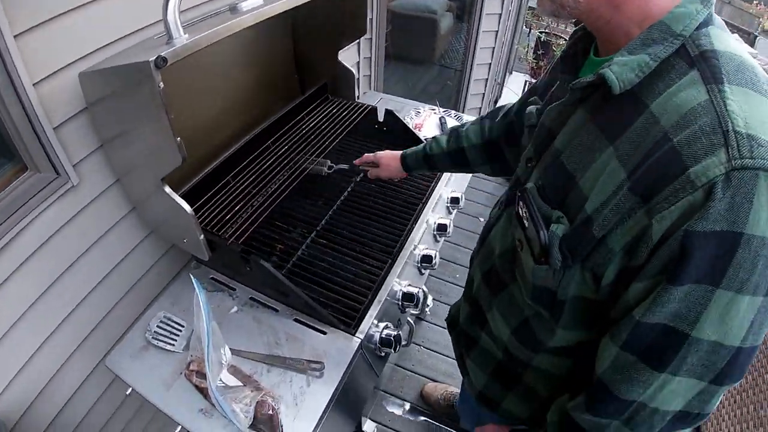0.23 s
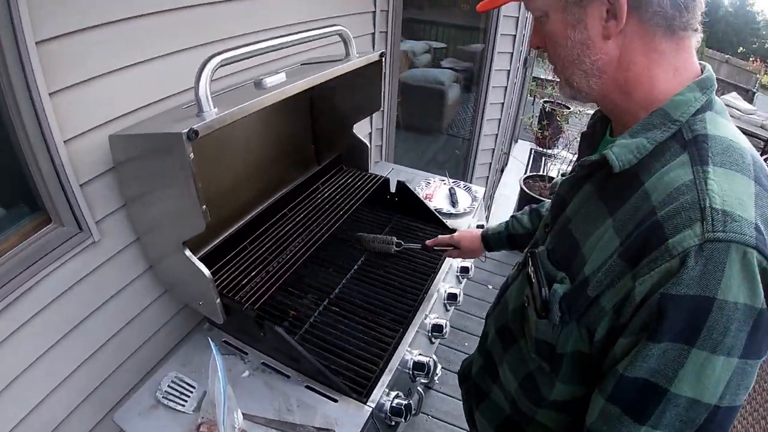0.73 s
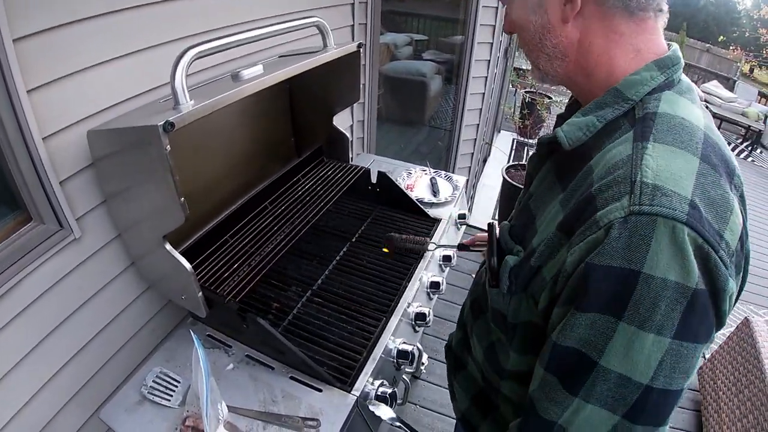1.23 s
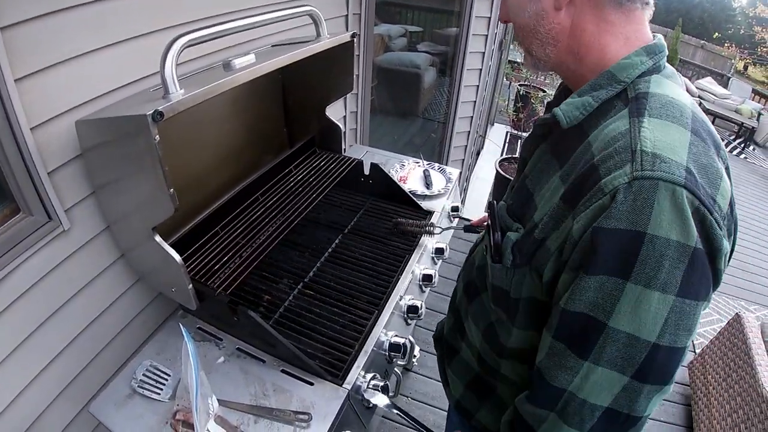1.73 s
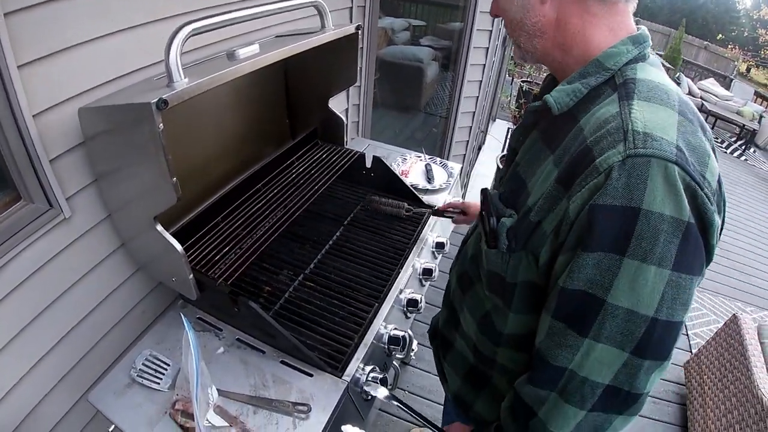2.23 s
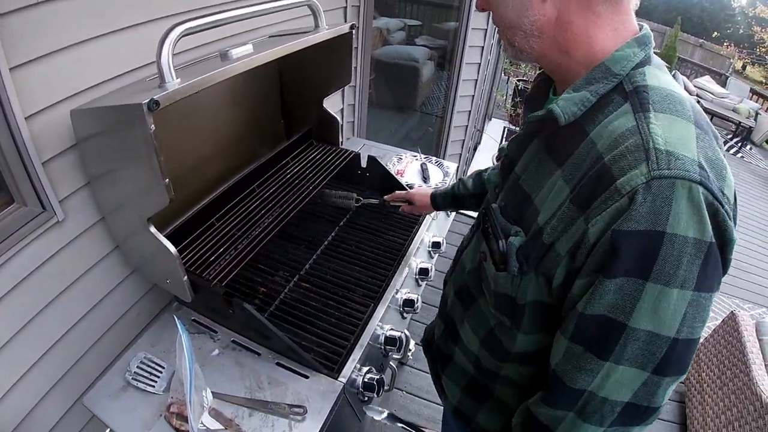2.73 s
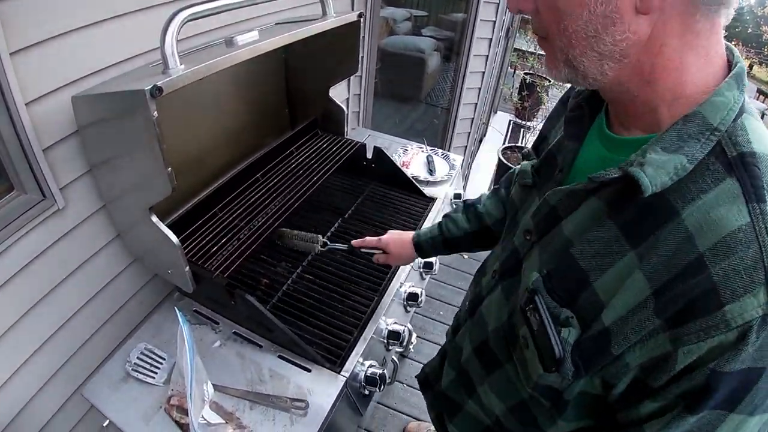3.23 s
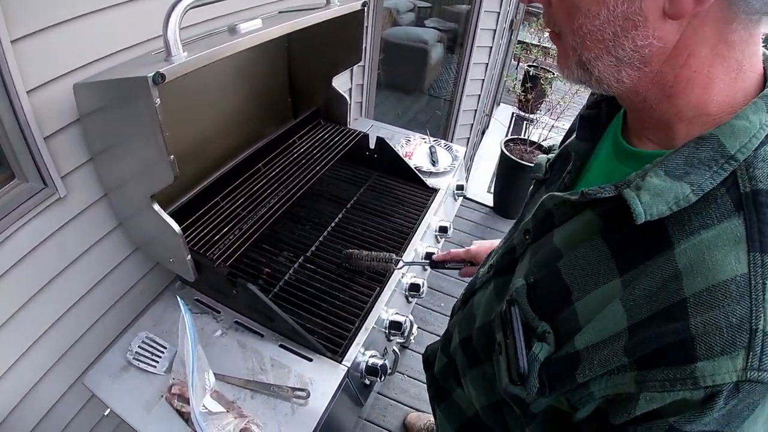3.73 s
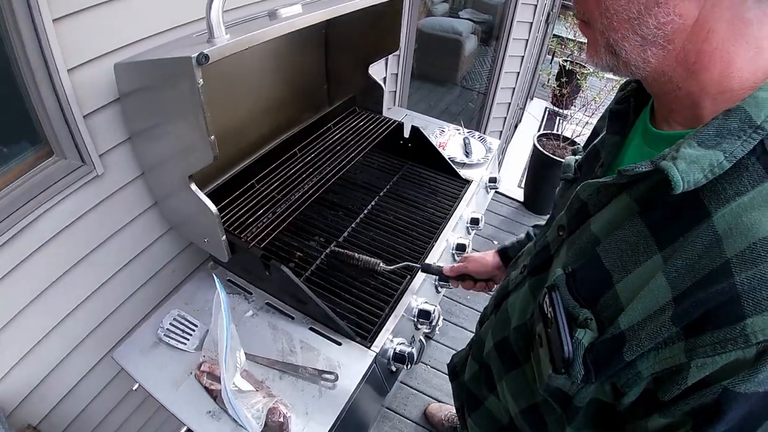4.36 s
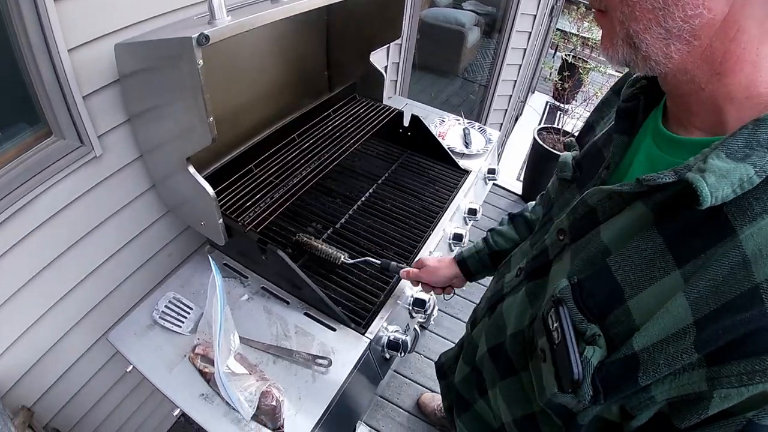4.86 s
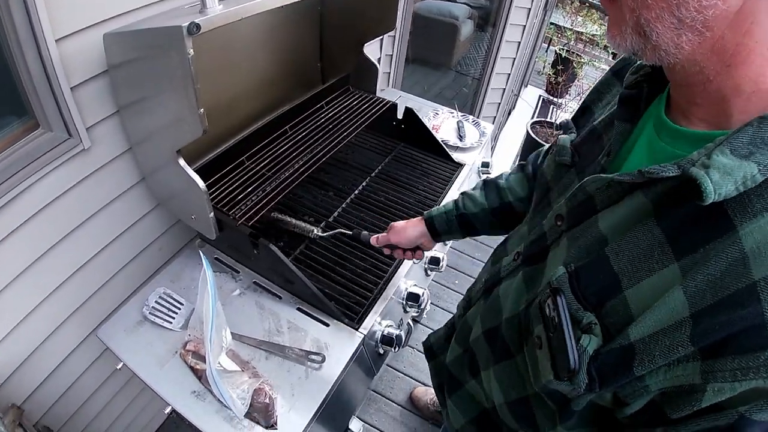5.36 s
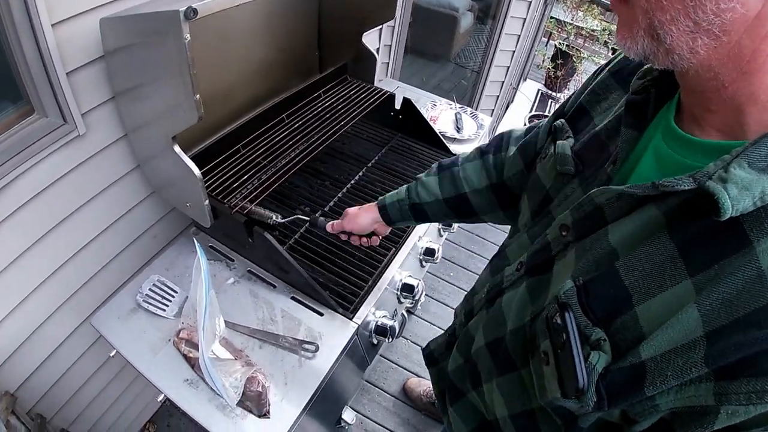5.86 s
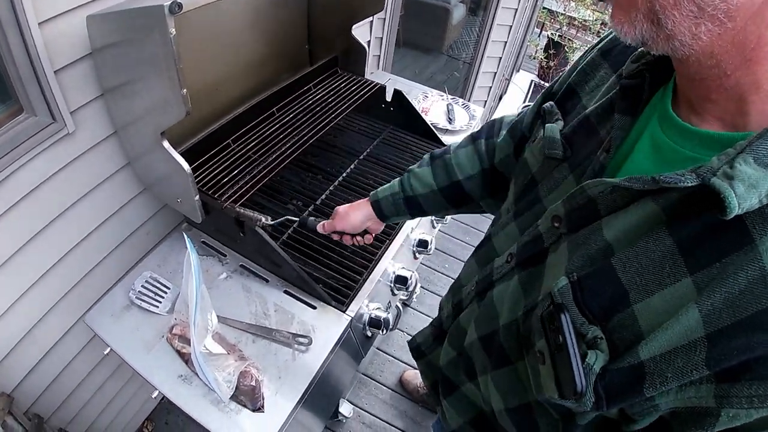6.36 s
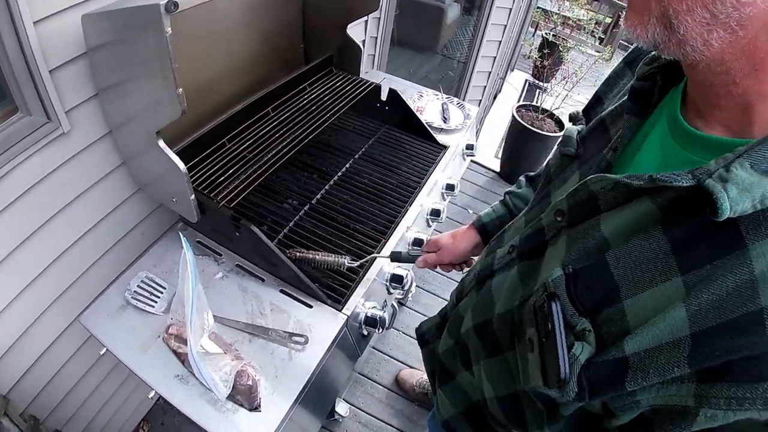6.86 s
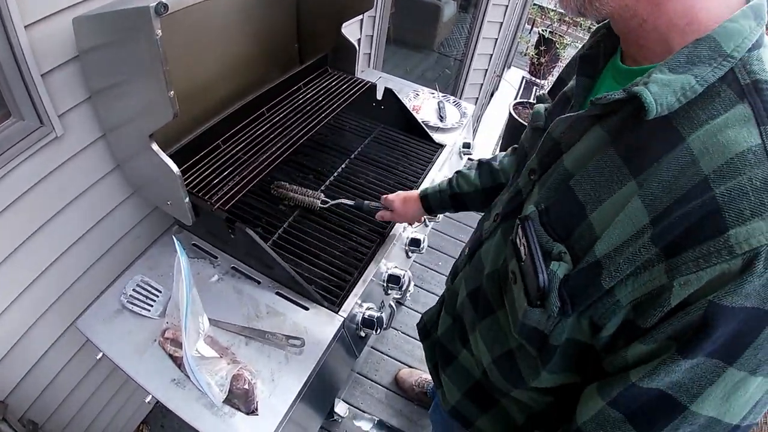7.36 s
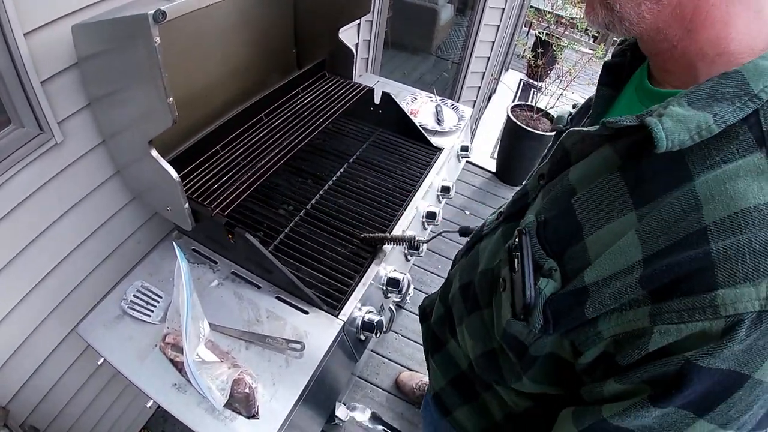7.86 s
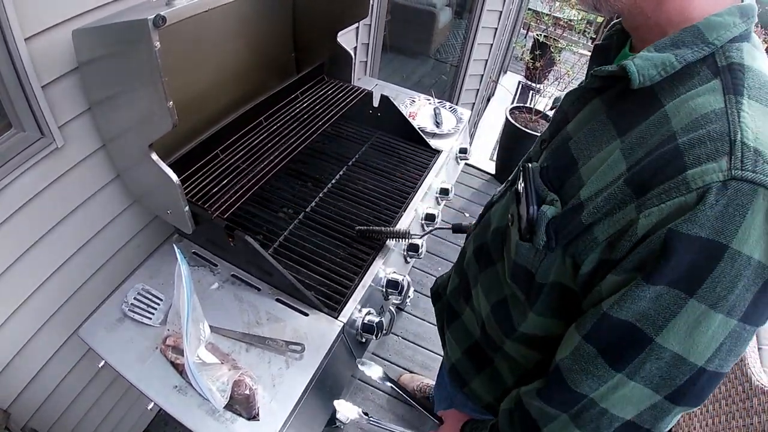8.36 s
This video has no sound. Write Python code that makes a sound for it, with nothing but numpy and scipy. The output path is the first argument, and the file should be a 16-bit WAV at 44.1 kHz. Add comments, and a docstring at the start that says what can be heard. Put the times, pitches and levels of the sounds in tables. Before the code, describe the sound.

Close outdoors on a deck, a stiff wire brush scrubs metal grill grates at four or five strokes a second. Each stroke bites with a gritty rasp and bright bristle hiss, then lets go. The brush head knocks the bars irregularly, making dull clanks while the hollow firebox and hood boom briefly. Near the end one long, even drag sings along the bars and fades. Quiet air lies beneath.

```python
"""Bristles hiss and rasp over the grates of a gas grill, four or five strokes a second, then one long drag.
Wire tips flick over the bars and ring them; each stroke bites, swells, sags and lets go.
The brush head knocks the grate, and firebox, hood and cart boom along, over quiet air and a faint whine.
Flicks are random impulses, coloured by spectra and resonances; knocks add decaying modes.
The two channels are equally loud and differ in phase until the drag, which is centred."""
import sys
import numpy as np
from scipy import signal
from scipy.fft import rfft, irfft, next_fast_len
from scipy.io import wavfile
from scipy.ndimage import uniform_filter1d, map_coordinates

SR = 44100
rng = np.random.default_rng(int(sys.argv[2]) if len(sys.argv) > 2 else 0)


def master_out(mix):
    """Clip the mix to full scale and print it as 16-bit PCM to the path in sys.argv[1]."""
    frames = np.transpose(np.atleast_2d(mix))
    ceiling = np.clip(frames, -1, 1)
    pcm = np.round(ceiling * 32767).astype(np.int16)
    wavfile.write(sys.argv[1], SR, pcm)


N = 379260

# Levels in all tables are relative: the sources trim them.
# strokes to and fro; fastest_at and heaviest_at are shares of the length:
# start_s, length_s, bite_s, fastest_at, heaviest_at, hiss_db, rasp_db, hood_db, cart_db
STROKES = [(-0.068, 0.2, 0.063, 0.47, 0.4, -46.5, -36, -35.5, -35),
           (0.131, 0.22, 0.014, 0.43, 0.41, -48, -38.5, -38, -39),
           (0.32, 0.19, 0.021, 0.44, 0.57, -46, -38, -38.5, -40.5),
           (0.521, 0.22, 0.009, 0.49, 0.41, -46, -37.5, -36.5, -45),
           (0.72, 0.2, 0.054, 0.13, 0.46, -43, -34, -34, -37),
           (0.939, 0.23, 0.013, 0.47, 0.35, -50.5, -36, -35, -39),
           (1.126, 0.24, 0.035, 0.62, 0.63, -46, -37, -36.5, -42),
           (1.363, 0.22, 0.055, 0.3, 0.29, -45, -32.5, -32.0, -38.5),
           (1.564, 0.22, 0.029, 0.56, 0.57, -43, -37.5, -35.5, -41.5),
           (1.788, 0.25, 0.055, 0.68, 0.08, -47.5, -37.5, -31, -34.5),
           (1.983, 0.27, 0.063, 0.44, 0.46, -46, -40, -41, -40.5),
           (2.241, 0.25, 0.011, 0.4, 0.23, -49, -39, -35, -37),
           (2.468, 0.24, 0.04, 0.4, 0.25, -46.5, -38.5, -35, -40),
           (2.704, 0.17, 0.072, 0.53, 0.21, -45, -36.5, -32.5, -41),
           (2.857, 0.19, 0.029, 0.5, 0.62, -44.5, -37, -35.5, -40),
           (3.083, 0.18, 0.021, 0.4, 0.3, -46.5, -34.5, -31.5, -37),
           (3.239, 0.2, 0.034, 0.55, 0.62, -44.5, -36, -37, -42),
           (3.454, 0.22, 0.013, 0.34, 0.41, -46, -37.5, -36, -38.5),
           (3.646, 0.21, 0.059, 0.52, 0.57, -44.5, -36, -36, -38),
           (3.862, 0.26, 0.034, 0.45, 0.48, -49.5, -41, -41.5, -43),
           (4.083, 0.22, 0.084, 0.2, 0.49, -44.5, -37.5, -37.5, -46.5),
           (4.339, 0.26, 0.044, 0.13, 0.39, -43, -38.5, -41, -43.5),
           (4.573, 0.2, 0.03, 0.32, 0.53, -44.5, -38, -34.5, -40),
           (4.798, 0.15, 0.011, 0.55, 0.3, -55, -49, -42, -43),
           (4.892, 0.19, 0.015, 0.56, 0.08, -47, -40, -32, -38),
           (5.049, 0.24, 0.058, 0.13, 0.47, -44.5, -41.5, -36, -44),
           (5.28, 0.24, 0.054, 0.7, 0.69, -48.5, -41, -37.5, -38.5),
           (5.493, 0.222, 0.052, 0.37, 0.39, -44.5, -39.0, -36, -43),
           (5.737, 0.28, 0.037, 0.24, 0.58, -47.5, -41, -41.5, -51),
           (5.971, 0.19, 0.04, 0.15, 0.49, -45.5, -38.5, -37.5, -44.0),
           (6.159, 0.26, 0.075, 0.18, 0.54, -47.5, -42.0, -41, -41.5),
           (6.375, 0.21, 0.052, 0.47, 0.44, -46, -39, -36.5, -42),
           (6.575, 0.27, 0.072, 0.23, 0.65, -47.5, -40.5, -42, -51),
           (6.802, 0.21, 0.036, 0.48, 0.55, -45.5, -39, -36.5, -47),
           (7.085, 0.11, 0.023, 0.17, 0.46, -56.5, -50.5, -48, -57),
           (7.258, 0.22, 0.026, 0.65, 0.6, -44.5, -38, -38, -42),
           (7.453, 0.19, 0.023, 0.37, 0.43, -42, -37, -35, -38),
           (7.669, 0.19, 0.063, 0.26, 0.77, -46.5, -40, -35, -46),
           (7.823, 0.13, 0.026, 0, 0.37, -41.5, -38, -30.5, -30)]
# how a part follows a stroke: attack_share (of bite), release_s,
# sag_db (per stroke length away from the peak), rest_db (between strokes)
HISS_LAW = (1.0, 0.0373, 11, -66)
# same columns
RASP_LAW = (0.5, 0.0939, 14.5, -63.5)
# same columns
HOOD_LAW = (0.76, 0.0148, 19.5, -49)
# same columns
CART_LAW = (0.6, 0.11, 22, -53)
# push of the arm in the last drag: time_s, push_db
DRAG_PUSH = [(7.98, -.5), (8.05, -0.5), (8.106, 1.2), (8.16, -.5), (8.235, .7), (8.35, -4.5), (8.52, -10),
             (8.6, -22)]
# head knocks on the grate; spot_hz is the pitch that the struck spot favours:
# time_s, thud_db, boom_db, clank_db, crunch_db, ping_db, spot_hz
KNOCKS = [(0.178, -24.5, -18.5, -34, -52, -44.5, 257), (0.2, -21.5, -21, -35.5, -50, -49, 261),
          (0.597, -39, -31, -39, -52, -45, 265), (0.786, -37.5, -34, -35, -38, -54, 500),
          (0.993, -29.5, -22, -30.5, -45, -57, 275), (1.195, -33, -31.5, -30, -36, -47, 300),
          (1.386, -36, -38, -31, -32.5, -46, 420), (1.4, -28, -28, -26, -36, -51, 400),
          (1.411, -28, -31, -27, -31, -52, 380), (1.448, -27.5, -18.5, -22.5, -27, -46, 285),
          (1.63, -35.5, -30, -31.5, -34.5, -52, 342), (1.649, -33, -27, -27, -37, -53, 490),
          (1.669, -40, -31, -25.5, -40, -55, 500), (1.809, -42, -32, -32, -37, -55, 290),
          (1.823, -29, -19.5, -22.5, -32, -48, 300), (1.998, -29.5, -33.5, -41, -46, -58, 290),
          (2.058, -36, -30, -30, -40, -55, 298), (2.124, -50, -31, -35, -43, -56, 282),
          (2.252, -45, -30.5, -31, -31.5, -44, 280), (2.281, -28, -22, -25.5, -33, -46, 340),
          (2.487, -46, -41, -54, -44, -51, 280), (2.53, -26.5, -30, -30.5, -39, -52.5, 400),
          (2.722, -42, -33.5, -35, -57.5, -54, 490), (2.844, -35.5, -36, -41.5, -50, -47.5, 280),
          (2.923, -34, -36, -34.5, -58, -48.5, 400), (3.134, -17, -20, -21.5, -41, -37.5, 274),
          (3.148, -19.5, -22.5, -30.5, -53, -49.5, 280), (3.352, -39, -36, -24.5, -38, -54.5, 510),
          (3.521, -22, -17, -22, -36, -38, 267), (3.541, -24, -39, -30, -41, -36, 390),
          (3.947, -41, -34.5, -37, -57, -56.5, 357), (4.369, -37, -36, -31.5, -41, -54, 500),
          (4.669, -30, -26, -26, -34, -56, 488), (4.817, -29.5, -37, -41, -61, -55, 240),
          (4.91, -20.5, -18.5, -25.5, -41, -36, 550), (5.117, -28, -23.5, -24, -39, -49, 205),
          (5.374, -33, -26, -29, -56, -63, 490), (5.555, -45.5, -37, -30.5, -32.5, -57, 660),
          (5.802, -34.5, -30, -34, -58, -49, 510), (6.022, -38, -25, -27.5, -48, -40, 402),
          (6.244, -38, -32.5, -38, -47, -48, 315), (6.421, -33, -36, -43, -57.5, -60, 340),
          (6.66, -31.5, -35, -40, -46, -58, 290), (6.899, -28.5, -29, -30, -49.5, -52, 470),
          (7.174, -39, -28, -31.5, -36, -44.5, 270), (7.506, -26.5, -24, -26, -31.5, -44, 487),
          (7.556, -37, -40, -31, -48, -34.5, 482), (7.784, -25.5, -23, -30.5, -35.5, -48, 275),
          (7.861, -33.5, -35, -25, -33, -63, 470), (7.98, -35, -41, -37, -44, -54.5, 300)]
# spectrum of the bristles: freq_hz, density_db (per Hz)
BRISTLE_SPECTRUM = [(1200, -23.5), (2400, -3.5), (4200, 0), (5500, -2.5), (6750, 1.5), (7600, -13),
                    (9000, -11), (10000, -9), (10900, -19), (11600, -24.5), (12300, -21.5), (13900, -21.5),
                    (15200, -42)]
# spectrum of the rasp: freq_hz, density_db (per Hz)
RASP_SPECTRUM = [(350, -25), (620, 0), (800, 0), (900, 4), (1090, 1.5), (1250, -2.5), (1900, -6.5),
                 (3000, -10), (4000, -28.5), (7000, -20), (12000, -57)]
# spectrum of the drag's hiss: freq_hz, density_db (per Hz)
DRAG_SPECTRUM = [(1200, -25), (2400, -3), (4200, 0.5), (5500, 0), (6750, 2), (7600, -10.5), (9000, -11),
                 (10100, -7.5), (10900, -22), (12300, -23), (13900, -23), (15200, -33)]
# spectrum of the grate's clank: freq_hz, density_db (per Hz)
CLANK_SPECTRUM = [(200, -24.5), (400, 0), (520, 4), (620, -1.5), (800, -4), (910, -0.5), (1080, -3),
                  (1250, -10.5), (1900, -12), (3200, -17), (4500, -24.5), (6800, -24), (8000, -35),
                  (15000, -54)]
# spectrum of the crushed wires: freq_hz, density_db (per Hz)
CRUNCH_SPECTRUM = [(700, -19), (1200, 0), (1800, 2), (2500, -4.5), (3200, -3.5), (4200, -14), (6800, -20),
                   (8000, -27), (15000, -45)]
# spectrum of the outdoor air: freq_hz, density_db (per Hz)
AIR_SPECTRUM = [(20, -19), (60, -12), (150, -13), (300, 6), (550, -4), (1000, -5), (3000, -56), (7000, -24),
                (15000, -45)]
# grate resonances added to every stroke: center_hz, level_db
GRATE_LINES = [(1060, -11), (1960, -10), (2130, -12), (2420, -13), (3590, -13), (4300, -10), (5550, -1),
               (6010, -15), (6680, -12)]
# bars singing under the drag: center_hz, nominal width_hz, level_db
SINGING_BARS = [(1536, 40, 0), (2510, 55, -11), (3120, 37, -1.5), (4700, 45, -2), (5100, 50, -4),
                (5700, 55, -7), (7450, 70, -10), (8300, 130, -14)]
# hood resonances: center_hz, nominal width_hz, level_db
HOOD = [(244.6, 35, -6), (272.7, 33, 0), (345, 43.4, -2.5), (388.7, 51, -5.5), (466.7, 44.4, -3),
        (504.2, 44, -4), (657, 122, -9.5)]
# cart resonances: center_hz, nominal width_hz, level_db
CART = [(31.5, 15, -3.5), (47.9, 20, 0.5), (67.5, 40, -7), (130.2, 26.8, -1), (152.6, 20, -5)]
# resonances of the brush's steel neck: center_hz, nominal width_hz, level_db
NECK = [(3000, 300, -2), (4720, 530, 0), (5670, 550, 2.5), (6520, 430, -1.5), (9500, 920, -11)]
# firebox modes rung by a knock: pitch_hz, level_db, t60_s
FIREBOX_MODES = [(124.7, -0.5, 0.16), (96, -4, 0.08), (151.6, -6, 0.22), (50.5, -12, 0.12)]
# hood modes rung by a knock: pitch_hz, level_db, t60_s
HOOD_MODES = [(204, -4, 0.12), (244.6, -1, 0.099), (278, 1.5, 0.11), (330.3, -5.5, 0.086),
              (392, -6.5, 0.08), (506.5, -7, 0.12), (660, -9, .13)]
# grate modes that ring on after a knock: pitch_hz, level_db, t60_s
GRATE_MODES = [(361.7, -1, 0.28), (408.4, -5, 0.18), (544.5, -5, 0.21), (681, -5, 0.24), (874, -3, 0.21),
               (1071, -7.5, 0.23), (1558, -8.5, 0.25), (2050, -13, 0.23)]
# sliding tops of the phase zones; the sixth zone lies above the last top:
# time_s, bass_top_hz, low_mid_top_hz, mid_top_hz, high_mid_top_hz, presence_top_hz
ZONES = [(0, 1570, 1620, 3980, 5300, 6100), (.9, 1480, 1390, 3930, 5330, 6100),
         (1.55, 1280, 1250, 3360, 4470, 5500), (1.8, 1560, 1550, 3200, 3950, 5370),
         (2.28, 750, 770, 3100, 3760, 5800), (2.4, 746, 804, 4200, 3950, 5600),
         (2.8, 1230, 1254, 3920, 3740, 5320), (3.8, 1160, 1137, 3420, 3400, 4740),
         (3.97, 1060, 1070, 4300, 4200, 4680), (4.25, 814, 840, 3800, 3800, 4370),
         (4.38, 1330, 1990, 3380, 3330, 4400), (4.75, 1650, 2260, 3100, 3160, 4430),
         (5.0, 870, 2030, 3200, 3270, 5100), (5.33, 620, 1920, 3350, 3360, 5550),
         (5.45, 540, 1930, 4500, 4400, 5800), (5.9, 430, 1950, 4000, 4100, 5730),
         (6.18, 910, 1850, 3550, 4270, 5500), (6.5, 1070, 1450, 3380, 4230, 5300),
         (7.0, 765, 1300, 2820, 4220, 4540), (7.15, 718, 1410, 2960, 2850, 4100),
         (7.9, 540, 714, 2600, 2700, 3700)]
# lead of the left channel in the bass: time_s, phase_rad
BASS_PHASE = [(6.45, 0), (6.6, -1.78)]
# lead in the low mids: time_s, phase_rad
LOW_MID_PHASE = [(4.4, 2.57), (6.2, 2.64), (6.5, 2.2)]
# lead in the mids: time_s, phase_rad
MID_PHASE = [(.3, -1.82), (2.3, -1.8), (2.7, -1.32), (5.3, -1.38), (5.45, -0.7)]
# lead in the high mids: time_s, phase_rad
HIGH_MID_PHASE = [(.3, 2.53), (1.2, 1.9), (2.2, 2.2), (6.2, 2.95)]
# lead in the presence: time_s, phase_rad
PRESENCE_PHASE = [(.6, -1.2), (1.0, -2), (2.3, -2.5), (4.3, -2.5), (5.3, -3), (6.2, -3), (6.3, -1),
                  (7.15, -1.8)]
# lead in the treble: time_s, phase_rad
TREBLE_PHASE = [(.48, -0.29), (.53, -2), (.95, -2), (1.0, 1.33), (7.5, 0.8)]

DRAG_S, DRAG_ATTACK_S = 7.975, 0.004
# each part in the drag: level_db, db_per_push_db
HISS_DRAG, RASP_DRAG = (-39.3, 1.03), (-34, 0.94)
HOOD_DRAG, CART_DRAG = (-32.5, 0.77), (-43, 2.8)
LEAD_S = 0.0045  # the head leans into a bar before it lands
CLANK_RISE_S, CLANK_T60_S = 0.0075, 0.085
CRUNCH_RISE_S, CRUNCH_T60_S = 0.0058, 0.087
PING_RISE_S, PING_T60_S = 0.0042, 0.062
FAVOUR_DB, FAVOUR_WIDTH_LOG = 10.5, 0.2  # lift of favoured modes; reach in natural-log pitch
ZONE_EDGE_HZ, ZONE_WANDER_SHARE, PHASE_WANDER_RAD = 45, 0.027, 0.2
TOP_HZ = 15200


def bristles():
    """Fine wire hiss: a faster slide gives more and louder flicks, and some wires twang."""
    _, _, _, fastest_at, _, hiss_db, *_ = np.transpose(STROKES)
    slide = effort(hiss_db, fastest_at, HISS_LAW, uneven_db=1.5)
    speed = np.sqrt(slide / slide.max())
    tips = flicks(11000 * speed, scatter_db=4.0, clump_db=1.4, clump_rate_hz=160)
    tips /= np.sqrt(speed / speed.mean())  # undo the loudness of density alone
    hiss = bars(coloured(tips * slide * amp(0.82), BRISTLE_SPECTRUM), t60_s=0.032, ring_db=0)
    wires = twangs(rate_hz=300, centre_hz=5200, spread_log=0.32, t60_s=0.18, scatter_db=3.0)
    wires = unit(coloured(wires, BRISTLE_SPECTRUM))
    return hiss + wires * slide * amp(-5.0)


def rasp():
    """Pressed tufts catch on the crust and twang the grate; they let go when the brush stops to turn."""
    *_, heaviest_at, _, rasp_db, _, _ = np.transpose(STROKES)
    press = np.hypot(effort(rasp_db, heaviest_at, RASP_LAW, uneven_db=0.9), dragged(*RASP_DRAG))
    catches = flicks(10000, scatter_db=2.5, clump_db=0.8, clump_rate_hz=300)
    scrape = bars(coloured(catches * press * amp(-3.0), RASP_SPECTRUM), t60_s=0.08, ring_db=2.0)
    tufts = twangs(rate_hz=480, centre_hz=2504, spread_log=0.3, t60_s=0.14, scatter_db=4.5)
    tufts = unit(coloured(tufts, RASP_SPECTRUM))
    return scrape + tufts * press * amp(-8)


def grate(x, width_hz):
    """The same steel lines colour all the scraping: resonances added to the direct sound."""
    def response(hz):
        total = 1
        for center_hz, level_db in GRATE_LINES:
            damping = 1j * hz * width_hz
            total = total + amp(level_db) * damping / (center_hz ** 2 - hz ** 2 + damping)
        return total
    return filtered(x, response)


def drag():
    """Pulled straight along the bars, the brush hisses densely and evenly and keeps their modes singing."""
    hiss = coloured(flicks(30000, scatter_db=1.5, clump_db=0.5, clump_rate_hz=100), DRAG_SPECTRUM)
    excitation = flicks(4000, scatter_db=1.5, clump_db=2.0, clump_rate_hz=92)
    singing = unit(resonate(excitation, SINGING_BARS))
    return (hiss + singing * amp(-4)) * dragged(*HISS_DRAG)


def knocks():
    """The head chatters on a bar, wires crunch, the neck pings; grate, firebox and hood ring and smear."""
    t = np.arange(SR // 3) / SR
    boom, force, crush, ping = np.zeros((4, N + SR))

    def blow_power(level_db, rise_s, t60_s):
        return (amp(level_db + 8 - 60 * t / t60_s) * (1 - np.exp(-(t / rise_s) ** 2))) ** 2

    for time_s, thud_db, boom_db, clank_db, crunch_db, ping_db, spot_hz in KNOCKS:
        start = round((time_s - LEAD_S) * SR)
        at = slice(start, start + len(t))
        boom[at] += amp(thud_db + 3.5) * struck(FIREBOX_MODES, t, rise_s=0.0056)
        boom[at] += amp(boom_db + 8) * struck(favoured(HOOD_MODES, spot_hz), t, rise_s=0.006)
        boom[at] += amp(clank_db - 8) * struck(GRATE_MODES, t, rise_s=0.0054)
        force[at] += blow_power(clank_db, CLANK_RISE_S, CLANK_T60_S)
        crush[at] += blow_power(crunch_db, CRUNCH_RISE_S, CRUNCH_T60_S)
        ping[at] += blow_power(ping_db, PING_RISE_S, PING_T60_S)
    chatter = flicks(3200, scatter_db=2.5, clump_db=0.36, clump_rate_hz=420) * np.sqrt(force[:N])
    crackle = flicks(6000, scatter_db=1.0, clump_db=-1.0, clump_rate_hz=230) * np.sqrt(crush[:N])
    neck = unit(resonate(flicks(7000, scatter_db=2, clump_db=0.5, clump_rate_hz=200), NECK))
    neck = neck * np.sqrt(ping[:N])
    clank = bars(coloured(chatter * amp(-1.0), CLANK_SPECTRUM), t60_s=0.047, ring_db=-4.0)
    crunch = bars(coloured(crackle * amp(-0.2), CRUNCH_SPECTRUM), t60_s=0.035, ring_db=-2.5)
    smeared_boom = bars(boom[:N], t60_s=0.3, ring_db=-11)
    return smeared_boom + clank + crunch + neck * amp(0.6)


def grill():
    """The scraping shakes the sheet-steel hood and rocks the cart: flicks through their resonances."""
    *_, heaviest_at, _, _, hood_db, cart_db = np.transpose(STROKES)
    hood = unit(resonate(flicks(1500, scatter_db=3, clump_db=1.8, clump_rate_hz=60), HOOD))
    cart = unit(resonate(flicks(600, scatter_db=3.5, clump_db=0.5, clump_rate_hz=53), CART))
    drone = np.hypot(effort(hood_db, heaviest_at, HOOD_LAW, uneven_db=1.56), dragged(*HOOD_DRAG))
    shake = np.hypot(effort(cart_db, heaviest_at, CART_LAW, uneven_db=2.5), dragged(*CART_DRAG))
    return hood * amp(-0.5) * drone + cart * amp(0.7) * shake


def background():
    """Quiet outdoor air and a faint thin whine: coloured noise and noise through one narrow resonance."""
    air = amp(-58.0) * coloured(rng.standard_normal(N), AIR_SPECTRUM)
    whine = amp(-72.5) * unit(resonate(rng.standard_normal(N), [(7930, 120, 0)]))
    return air + whine


def flicks(rate_hz, scatter_db, clump_db, clump_rate_hz):
    """Wire tips slip off the bars: tiny impulses of uneven size that come in tufts."""
    hits = rng.random(N) < rate_hz / SR
    sizes = rng.choice([-1, 1], N) * amp(scatter_db * rng.standard_normal(N))
    return unit(hits * sizes * amp(clump_db * wobble(clump_rate_hz)))


def twangs(rate_hz, centre_hz, spread_log, t60_s, scatter_db):
    """Single wires spring free and ring for a moment, each at its own pitch."""
    draws = rng.standard_normal((int(rate_hz * N / SR), 2))
    starts = rng.integers(0, N, len(draws))
    t = np.arange(SR // 14) / SR
    pitch_hz = np.clip(centre_hz * np.exp(spread_log * draws[:, :1]), 500, SR / 3)
    decay = amp(scatter_db * np.tanh(draws[:, 1:]) - 60 * t / t60_s)
    rings = decay * np.sin(2 * np.pi * pitch_hz * t) * (1 - np.exp(-t / 0.0024))
    places = starts[:, None] + np.arange(len(t))
    return unit(np.bincount(places.ravel(), rings.ravel(), N)[:N])


def bars(x, t60_s, ring_db):
    """Every stroke, and every stretch of the drag, excites other dense steel modes of the bars."""
    t = np.arange(SR // 6) / SR
    out = np.zeros(N + SR)
    stroke_edges = [round(row[0] * SR) for row in STROKES[1:]]
    edges = [0, *stroke_edges, *range(round(DRAG_S * SR), N, SR // 6), N]
    for a, b in zip(edges, edges[1:]):
        ring = rng.standard_normal(len(t)) * amp(-60 * t / t60_s)
        ring *= amp(ring_db) / np.linalg.norm(ring)
        ring[0] += 1  # direct sound
        ring /= np.linalg.norm(ring)
        out[a:b + len(t) - 1] += signal.fftconvolve(x[a:b], ring)
    return out[:N]


def struck(modes, t, rise_s):
    """Sheet-metal modes that swell while the head bears on them, then die away."""
    draws = rng.standard_normal((len(modes), 3))
    total = np.zeros(len(t))
    for (pitch_hz, level_db, t60_s), (size, detune, phase) in zip(modes, draws):
        decay = amp(level_db + 1.45 * size - 60 * t / t60_s)
        total += decay * np.sin(2 * np.pi * pitch_hz * (1 + 0.0256 * detune) * t + np.pi * phase)
    return (1 - np.exp(-(t / rise_s) ** 2)) * total


def favoured(modes, spot_hz):
    """Each spot on the grate excites the modes near its own pitch best; the total energy is 1."""
    pitch_hz, level_db, t60_s = np.transpose(modes)
    level_db = level_db + FAVOUR_DB * np.exp(-(np.log(pitch_hz / spot_hz) / FAVOUR_WIDTH_LOG) ** 2)
    level_db = level_db - 20 * np.log10(np.linalg.norm(amp(level_db)))
    return np.transpose([pitch_hz, level_db, t60_s])


def effort(level_db, peak_at, law, uneven_db):
    """Gain of a part: a stroke bites, swells, sags, lets go at the turn; the crust makes it uneven."""
    attack_share, release_s, sag_db, rest_db = law
    t = np.arange(N) / SR
    gain = np.zeros(N)
    for (start_s, length_s, bite_s, *_), db, peak in zip(STROKES, level_db, peak_at):
        at = slice(max(0, round(start_s * SR)), round((start_s + length_s) * SR))
        age_s = t[at] - start_s
        attack = np.clip(age_s / (attack_share * bite_s), 0, 1)
        contact = attack * np.clip((length_s - age_s) / release_s, 0, 1)
        sagged = amp(db - sag_db * np.abs(age_s / length_s - peak))
        gain[at] = np.hypot(gain[at], contact ** 1.28 * sagged)
    return np.hypot(gain * amp(uneven_db * wobble(45)), amp(rest_db))


def dragged(level_db, db_per_push_db):
    """Gain over the last drag: a sudden bite, then the part follows the push of the arm."""
    t = np.arange(N) / SR
    push_db = np.interp(t, *np.transpose(DRAG_PUSH))
    contact = np.clip((t - DRAG_S) / DRAG_ATTACK_S, 0, 1)
    return contact * amp(level_db + db_per_push_db * push_db)


def amp(db):
    """Decibels to gain."""
    return 10 ** (np.asarray(db) / 20)


def unit(x):
    """Scale to rms 1."""
    return x / np.sqrt(np.mean(x ** 2) + 1e-20)


def wobble(rate_hz, step=16):
    """A smooth random curve, rate_hz knots a second, computed every step samples."""
    coarse = np.arange(0, N, step)
    knots = rng.standard_normal(int(N * rate_hz / SR) + 4)
    return np.interp(np.arange(N), coarse, map_coordinates(knots, [coarse * rate_hz / SR]))


def filtered(x, response):
    """x times a complex response of frequency."""
    m = next_fast_len(N + SR // 2)
    return irfft(rfft(x, m) * response(np.fft.rfftfreq(m, 1 / SR)), m)[..., :N]


def coloured(x, spectrum, size=4096):
    """Minimum-phase filter of energy 1, its spectrum read on a log-frequency axis."""
    hz = np.fft.rfftfreq(size, 1 / SR)
    freq_hz, density_db = np.transpose(spectrum)
    gain = amp(np.interp(np.log(hz + 1), np.log(freq_hz + 1), density_db))
    cepstrum = irfft(np.log(gain))
    cepstrum[1:size // 2] *= 2  # fold to make it causal
    cepstrum[size // 2 + 1:] = 0
    pulse = irfft(np.exp(rfft(cepstrum)))
    return signal.fftconvolve(x, pulse / np.linalg.norm(pulse))[:len(x)]


def resonate(x, peaks):
    """x through a body's resonances, each applied twice for dark valleys."""
    def response(hz):
        total = 0
        for center_hz, width_hz, level_db in peaks:
            # each pass is widened, so that the pair comes out near width_hz
            bottom = center_hz ** 2 - hz ** 2 + 1j * hz * 1.496 * width_hz
            total = total + amp(level_db) * (1j * hz * 1.6 * width_hz / bottom) ** 2
        return total
    return filtered(x, response)


def phase_zones(x, size=1024):
    """Two equally loud channels that differ in phase, zone by zone in frequency; the drag is centred."""
    overlap = size - size // 4
    hz, t, z = signal.stft(x, SR, nperseg=size, noverlap=overlap)
    zone_s, *tops_hz = np.transpose(ZONES)
    wander = 1 + ZONE_WANDER_SHARE * np.interp(t, np.arange(N) / SR, wobble(12))
    below = []
    for top_hz in tops_hz:
        edge_hz = np.interp(t, zone_s, top_hz) * wander
        below.append(0.5 + 0.5 * np.tanh((edge_hz - hz[:, None]) / ZONE_EDGE_HZ))
    shares = np.diff([np.zeros(z.shape), *below, np.ones(z.shape)], axis=0)
    patches = uniform_filter1d(rng.standard_normal(z.shape), size=6, axis=0)
    patches = unit(uniform_filter1d(patches, size=7, axis=1))
    phases = [np.interp(t, *np.transpose(BASS_PHASE))]  # the bass phase does not wander
    for table in (LOW_MID_PHASE, MID_PHASE, HIGH_MID_PHASE, PRESENCE_PHASE, TREBLE_PHASE):
        phases.append(np.interp(t, *np.transpose(table)) + PHASE_WANDER_RAD * patches)
    blend = sum(share * np.exp(1j * phase) for share, phase in zip(shares, phases))
    gap_rad = np.angle(blend) * (t < DRAG_S)
    channels = np.array([z, z * np.exp(-1j * gap_rad)])
    return signal.istft(channels, SR, nperseg=size, noverlap=overlap)[1][:, :N]


def scene():
    """Brush, grill and air, spread over two channels."""
    scraping = amp(-0.5) * grate(bristles() + rasp(), width_hz=51)
    return phase_zones(scraping + drag() + knocks() + grill() + background())


def record(dry):
    """Nothing passes above the band limit."""
    return filtered(dry, lambda hz: hz < TOP_HZ)


dry = scene()
out = record(dry)
master_out(out)
```